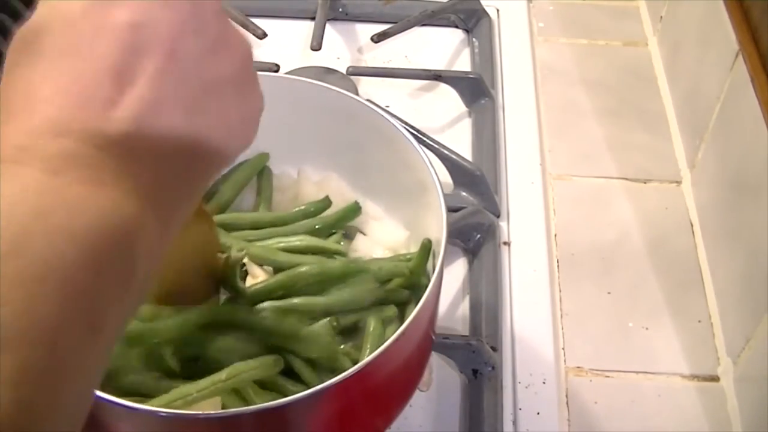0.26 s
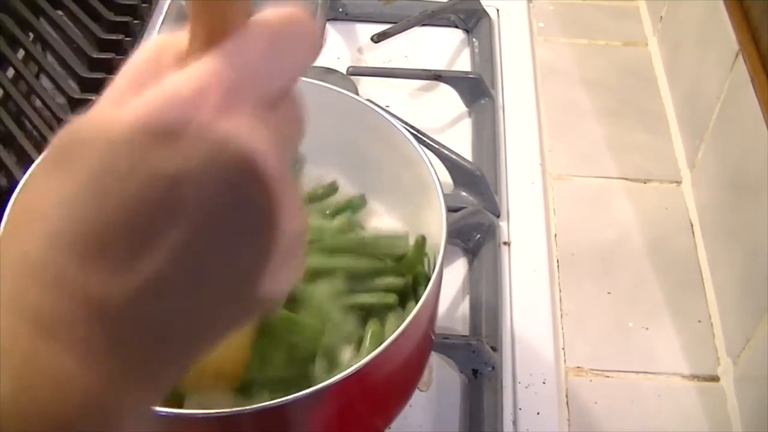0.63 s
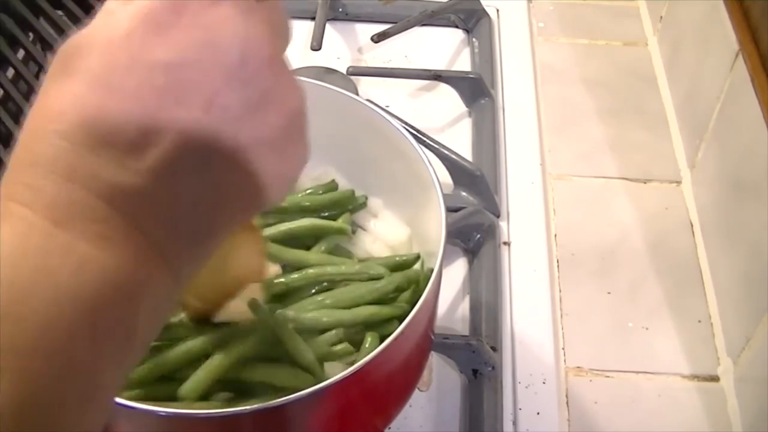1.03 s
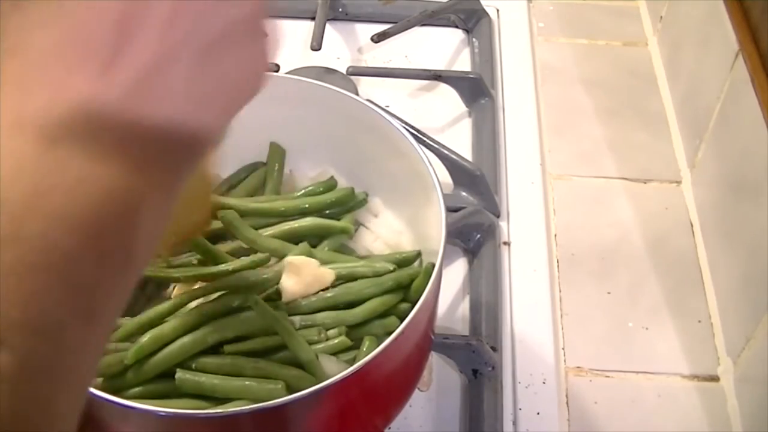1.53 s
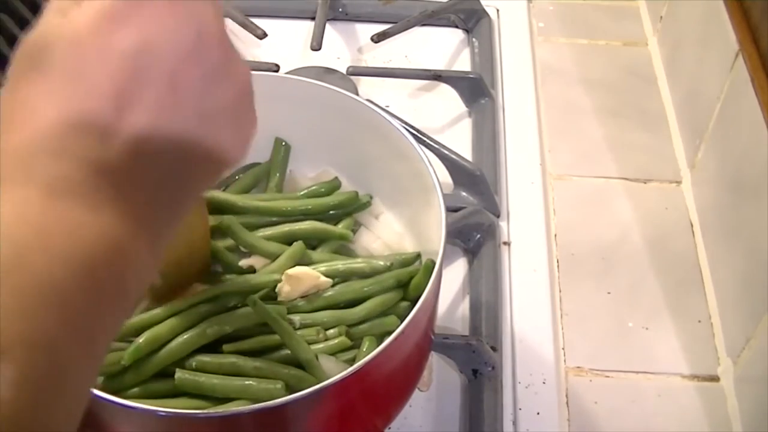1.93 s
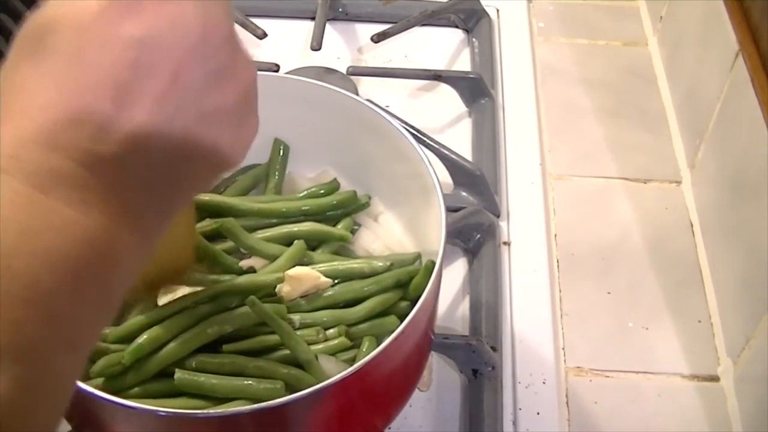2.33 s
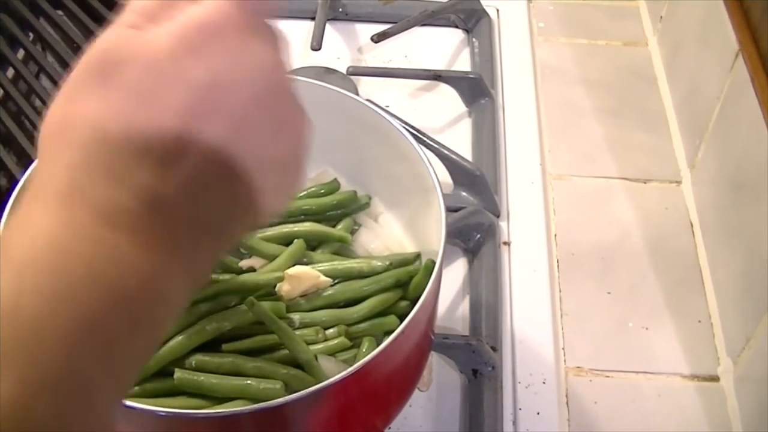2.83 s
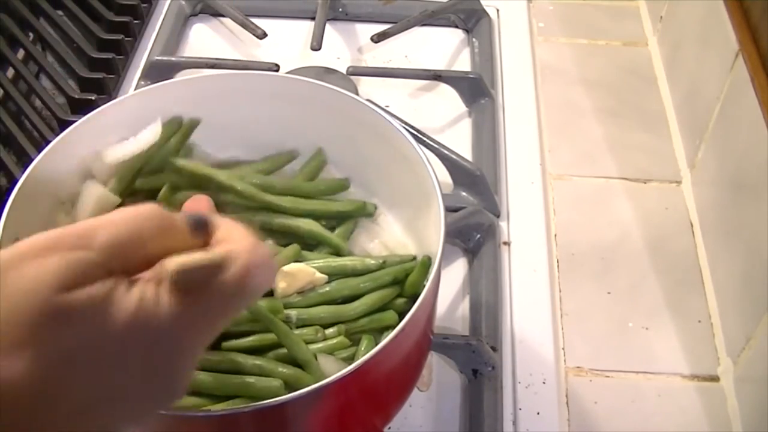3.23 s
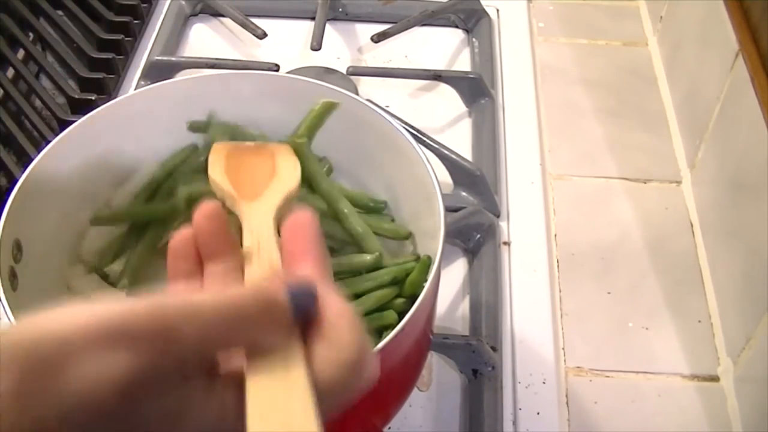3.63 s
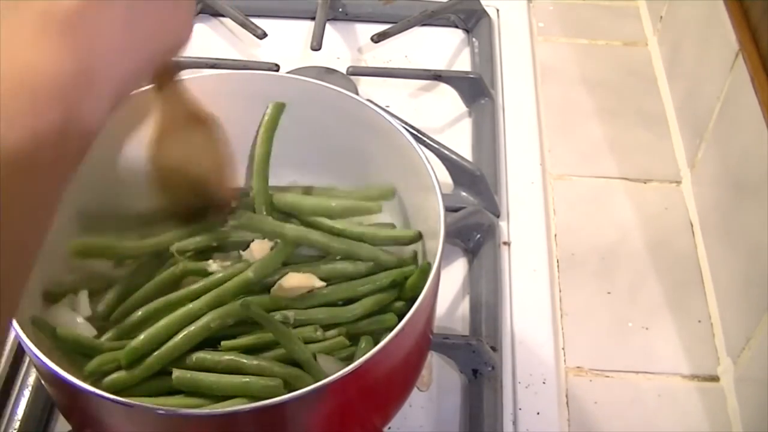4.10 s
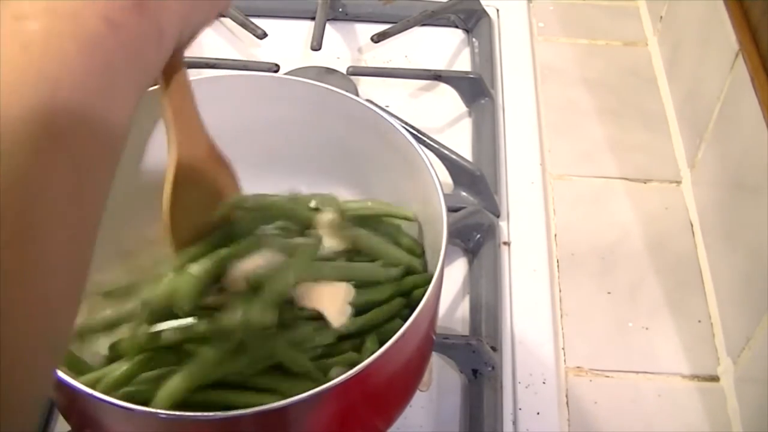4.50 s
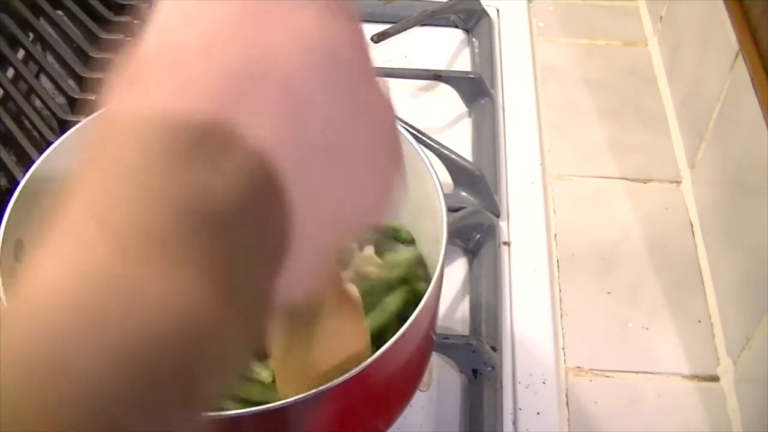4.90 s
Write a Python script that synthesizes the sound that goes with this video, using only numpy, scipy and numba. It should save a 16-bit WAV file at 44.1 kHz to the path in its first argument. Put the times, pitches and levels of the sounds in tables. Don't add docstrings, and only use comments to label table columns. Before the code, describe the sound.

Green beans sizzle steadily in a pot with spitting fat while a wooden spoon taps, knocks hard and scrapes the metal wall.

```python
import sys
import numpy as np
from scipy import signal
from scipy.fft import rfft, irfft, next_fast_len
from scipy.io import wavfile
from scipy.ndimage import uniform_filter1d
from numba import njit

SR = 44100
rng = np.random.default_rng(int(sys.argv[2]) if len(sys.argv) > 2 else 0)


def master(y):
    cut = np.clip(np.atleast_2d(y).T, -1, 1)
    pcm = np.round(cut * 32767)
    wavfile.write(sys.argv[1], SR, pcm.astype(np.int16))


def volts(x):
    e = np.asarray(x, float) / 20
    return 10 ** e


N = 227247
TRAVEL_S = 0.001139
RADIATES_HZ = 590

# f/Hz, level/dB, t60/s
POT = [(353, -2, 0.19), (442, -9, 0.46), (481, -12, 0.96), (592.4, -5, 0.4), (651.3, 7, 0.12),
       (699, -5, 0.63), (712, 12, 0.08), (839, 3.5, 0.11), (857, 3.5, 0.32), (1022, 8.5, 0.044),
       (1115, 17.5, 0.032), (1270, 5, 0.63), (1264, 13, 0.19), (1357, 25.5, 0.024), (1460, -5, 0.41),
       (1510, 3, 0.052), (1793, 19, 0.036), (1868, 14.5, 0.054), (2210, 6, 0.06), (2378, -5.5, 0.36),
       (2660, 5.5, 0.07)]
# f/Hz, level/dB, t60/s
SPOON = [(773, 12.5, 0.054), (1387, 11.5, 0.034), (2000, 11, 0.023), (4330, -3, 0.012)]
# t/s, peak/dB, middle modes/dB, upper modes/dB, thump/dB
KNOCKS = [
    (2.19, -7.5, 9, -1.5, -17.5),
    (2.665, -9.5, 7, -1, -22.5),
    (3.041, -7, 0.5, -7, -42),
    (4.206, 1, 3.5, -7.5, -46),
]


def times():
    return np.arange(N) / SR


def unit(x):
    return x / np.sqrt(np.mean(x ** 2))


def decay(t, t60):
    return volts(-60 * t / t60)


def sine(hz, t):
    return np.sin(2 * np.pi * hz * t)


def band(x, hz, width):
    return signal.lfilter(*signal.iirpeak(min(hz, 0.45 * SR), hz / width, fs=SR), x)


def butter(x, order, hz, kind="low"):
    return signal.sosfilt(signal.butter(order, hz, kind, fs=SR, output="sos"), x)


def colour(x, points):
    hz, db = np.transpose(points)
    size = next_fast_len(N)
    grid = np.log(np.arange(size // 2 + 1) * SR / size + 1)
    gain = volts(np.interp(grid, np.log(hz), db))
    return irfft(rfft(x, size) * gain, size)[..., :N]


def walk(rate):
    k = int(SR / rate)
    steps = np.repeat(rng.standard_normal(N // k + 1), k)
    return 1.2 * uniform_filter1d(uniform_filter1d(steps, k), k)[:N]


def clicks(rate, spread_db):
    where, size, sign = rng.random((3, N))
    heights = volts(-spread_db * np.log(size + 1e-9)) * np.sign(sign - 0.5)
    return unit((where < rate / SR) * heights)


def puffs(rate, spread_db, t60):
    swell = signal.lfilter([1], [1, -volts(-60 / (t60 * SR))], np.abs(clicks(rate, spread_db)))
    return unit(swell * rng.standard_normal(N))


def frying():
    # t/s, level/dB
    fry_levels = [(0.0, -29), (0.4, -32), (0.66, -29), (0.85, -32), (1.03, -28.5), (1.25, -31),
                  (1.87, -31.5), (2.7, -31.5), (3.2, -31), (3.57, -31), (3.76, -33), (4.1, -31), (4.4, -29),
                  (4.62, -32.5), (4.92, -28), (5.15, -33)]
    # f/Hz, density/dB per Hz
    fry_colour = [(25, -47), (70, -40.5), (120, -33.5), (160, -30.5), (240, -17), (330, -16), (650, -8),
                  (950, -11.5), (1500, -5), (2500, -9), (4400, -6), (5200, -12.5), (8200, -17),
                  (15500, -38)]
    # f/Hz, width/Hz, level/dB
    pot_song = [(839.6, 20, -21), (1255.7, 12, -14.5), (1290, 37, -14.5), (1903, 300, -14),
                (2910, 500, -14), (5860, 860, -11)]
    s, db = np.transpose(fry_levels)
    bright_db = 2.3 + 0.38 * (db + 30.5)

    fizz = puffs(700, 0.85, 0.0092) * volts(walk(23))
    hiss = colour(rng.standard_normal(N) + volts(-6.5) * fizz, fry_colour)
    low = butter(hiss, 1, 2500)
    high = (hiss - low) * volts(0.7 * walk(18))
    hiss = high + low * volts(0.6 * walk(14) - np.interp(times(), s, bright_db))

    top = butter(hiss, 2, 7000, "high")
    crackle = unit(band(band(clicks(25, 1.5), 5500, 6000), 5500, 6000))
    hiss = hiss + top * (volts(1.7 * walk(8)) - 1) + volts(-23) * hiss.std() * crackle
    song = np.zeros(N)
    for hz, width, song_db in pot_song:
        song += volts(song_db) * unit(band(hiss, hz, width)) * volts(1.5 * walk(12))
    return (unit(hiss) + song) * volts(np.interp(times(), s, db) + 2.5)


def hum():
    # f/Hz, rms/dB
    hum_lines = [(120, -72.5), (240, -58.5)]
    return sum(np.sqrt(2) * volts(db + 2.2 * walk(22.53)) * sine(hz, times()) for hz, db in hum_lines)


def push(rows, contact_s):
    force = np.zeros((3, N))
    shape = np.hanning(int(contact_s * SR) + 2)
    for s, db, middle_db, upper_db, *_ in rows:
        i = int((s + TRAVEL_S) * SR)
        level = volts(db + np.array([[0], [middle_db], [upper_db]]))
        force[:, i:i + len(shape)] += level * shape / shape.sum()
    return force


def ring(force, modes, sign=1, damp=0.49):
    split_hz = (1050, 1600)
    out = np.zeros(N)
    for k, (hz, db, t60) in enumerate(modes):
        pole = np.exp(2j * np.pi * hz / SR - np.log(1000) / (damp * t60 * SR))
        group = force[np.searchsorted(split_hz, hz)]
        out += sign ** k * volts(db) * signal.lfilter([1], [1, -pole], group).imag
    return out


def taps():
    # t/s, peak/dB, middle modes/dB, upper modes/dB, note f/Hz
    tap_rows = [(0.022, -22.5, -5.5, -7, 690), (0.087, -25.5, 2, 9, 853), (0.277, -14.5, 2, -18, 771),
                (0.599, -29, 6, 1, 1294), (0.732, -20, -5, -14, 680), (1.005, -22, -3, -1, 677),
                (1.086, -31, 14, 1, 1290), (1.372, -22, 8, -13, 1300), (1.671, -21, 2, -7, 770),
                (1.912, -24.5, -12, -14, 787), (2.17, -15.5, -16, -13, 690), (3.546, -41, 22.5, 0, 1300),
                (4.062, -31, 12, 21, 1880), (4.23, -18, -3, -7, 800), (4.298, -15, 0, 4, 1804),
                (4.358, -15.5, -7, -10, 677), (4.403, -22.5, 6.5, 8, 748), (4.705, -32, 13, 19, 1290),
                (4.93, -32.5, 14, 6, 1290)]
    force = volts(-23) * push(tap_rows, 0.0005)
    out = ring(force, POT, sign=-0.971, damp=0.92) + ring(volts(-1) * force, SPOON)
    out = butter(out, 4, RADIATES_HZ, "high")
    t = np.arange(SR // 4) / SR
    for s, db, *_, hz in tap_rows:
        rise = 1 - np.exp(-t / 0.002)
        note = volts(db + 4) * decay(t, 0.055) * rise * sine(hz, t)
        i = int(s * SR)
        out[i:i + len(t)] += note[:N - i]
    return out


def spits():
    # t/s, peak/dB, centre f/Hz, low
    # part/dB, top part/dB
    spit_rows = [(0.0862, -10.5, 3700, 6, -9), (0.1362, -16, 3720, -10, -27), (0.358, -8, 4330, -7, -28),
                 (0.596, -16, 4380, -5, -31), (0.655, 3.5, 6060, -11.5, -29), (0.8362, -11, 4250, -11, -26),
                 (0.9446, -14, 3980, -9, -29), (1.064, -11, 4300, -3, -14), (1.2875, -11, 4330, -17, -11),
                 (1.4616, -11, 4760, -14, -37), (1.533, -14, 4000, -13, -18), (1.7133, -23, 3540, -29, -27),
                 (2.1908, -3.5, 4220, 9, -24), (2.302, -11.5, 3900, 4, -29), (2.626, -14, 4160, -11, -7),
                 (2.6647, -11.5, 3300, 3, -15), (2.9245, -15.5, 3730, 6, -4), (3.043, -12.5, 3880, 13, -34),
                 (3.2965, -4.5, 6100, -9, -34), (3.485, -11, 4210, -2, -29), (4.184, -7, 3660, -0.5, -11),
                 (4.2056, 3.5, 4700, -17, -7.5), (4.7507, -2.5, 6050, -1.5, -44),
                 (4.944, -25, 4040, 4, -25)]
    out, puff = np.zeros(N + SR), np.zeros(N + SR)
    t = np.arange(SR // 10) / SR
    for s, db, hz, low_db, top_db in spit_rows:
        noise = rng.standard_normal((3, len(t)))
        snap = sine(hz, t) * decay(t, 0.0033)
        tick_fade = decay(t, 0.00076) + volts(-20.5) * decay(t, 0.04)
        tick = volts(top_db + 4.5) * unit(band(noise[0], 9900, 7000)) * tick_fade
        slap = unit(band(band(noise[1], 1800, 2000), 2100, 2000))
        slap = volts(low_db - 11.5) * slap * decay(t, 0.062)
        spray_db = -11 - 19 * np.log2(hz / 4000)
        spray = unit(band(band(noise[2], hz, 0.7 * hz), hz, 0.7 * hz))
        spray = volts(spray_db) * spray * decay(t, 0.073)
        i = int((s + 0.65 * TRAVEL_S) * SR)
        out[i:i + len(t)] += volts(db - 3.0) * (snap + tick + slap + spray)
        puff[i:i + len(t)] += volts(2 * db - 50) * decay(t, 0.025) * sine(90, t)
    return butter(out[:N], 2, RADIATES_HZ, "high") + puff[:N]


def knocks():
    blows = push(KNOCKS, 0.00018)
    out = ring(volts(-19.5) * blows, POT, sign=-1.0735) + ring(volts(-5.5) * blows, SPOON)
    out = butter(out, 4, RADIATES_HZ, "high")
    t = np.arange(SR // 4) / SR
    for s, db, *_, thump_db in KNOCKS:
        crack = volts(-36) * band(rng.standard_normal(len(t)), 5500, 6000) * decay(t, 0.003)
        thump = volts(thump_db + 13.5) * band(sine(200, t) * decay(t, 0.013), 250, 460)
        grate = volts(db - 24) * decay(t, 0.16) * sine(330, t)
        i = int((s + TRAVEL_S) * SR)
        out[i:i + len(t)] += crack + thump + grate
    return out


def drag(start_s, db, hold_s, fade_db_per_s, bright_db):
    t = np.maximum(times() - start_s, 0)
    sag_db = 42 * np.minimum(t, hold_s)
    slide = volts(db - sag_db - fade_db_per_s * np.maximum(t - hold_s, 0))
    rattle = volts(-4) * decay(t, 0.081)
    level = (t > 0) * (slide + rattle)
    middle_db = bright_db - 17.5 * np.exp(-t / 0.074)
    return level * volts([0 * t, middle_db, 0 * t + bright_db - 9])


def scrapes():
    # start t/s, level/dB, hold/s, fade/dB per s, brightness/dB
    scrape_rows = [
        (2.191, -19, 0.085, 153, 1),
        (2.667, -18, 0.031, 197, -0.5),
        (3.043, -21, 0.03, 170, -2),
        (4.215, -23, 0.11, 198, 0),
    ]
    slips = np.array([clicks(1500, 2.0) for _ in range(3)])
    rub = slips * sum(drag(*row) for row in scrape_rows)
    out = ring(volts(-38) * rub, POT, sign=-1.0735) + ring(volts(-38) * rub, SPOON)
    out += volts(-5) * band(band(rub[0] + 2 * rub[2], 3000, 1600), 3000, 2200)
    return butter(out, 4, RADIATES_HZ, "high")


def smear(x, t60):
    t = np.arange(int(t60 * SR)) / SR
    tail = rng.standard_normal(len(t)) * decay(t, t60)
    return signal.fftconvolve(x, tail / np.sqrt(np.sum(tail ** 2)))[:N]


def scene():
    events = taps() + spits() + knocks() + scrapes()
    room = volts(-13) * band(smear(events, 0.13), 1100, 3100)
    mid = events + frying() + hum() + room
    side_colour = [(30, -9), (300, 3), (1400, -7), (4500, 4), (8000, 5), (14000, -6)]  # f/Hz, level/dB
    side = volts(-23.5) * colour(smear(mid, 0.046), side_colour)
    return np.array([mid + side, mid - side])


@njit
def ducking(x, top, slope, attack, release):
    gain, e = np.ones(len(x)), 0.
    for i in range(len(x)):
        a = abs(x[i])
        e += (a - e) * (attack if a > e else release)
        if e > top:
            gain[i] = (top / e) ** slope
    return gain


def roll_off(x):
    return signal.sosfilt(signal.butter(12, 16480, fs=SR, output="sos"), x)


def record(dry):
    gain = ducking(dry.mean(axis=0), 0.2, 0.91, 0.0079, 0.0024)
    clipped = np.clip(dry * gain, -1, 1)
    top_cut = signal.ellip(8, 0.2, 50, 15600, fs=SR, output="sos")
    mix = np.clip(signal.sosfilt(top_cut, clipped), -1, 1)
    return roll_off(mix)


dry = scene()
out = record(dry)
master(out)
```